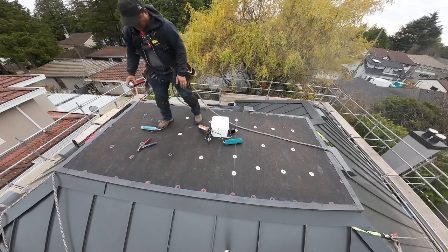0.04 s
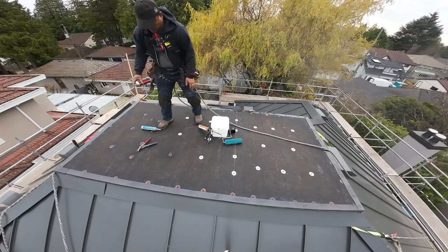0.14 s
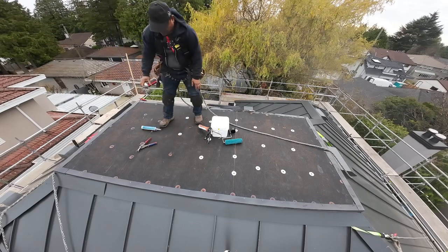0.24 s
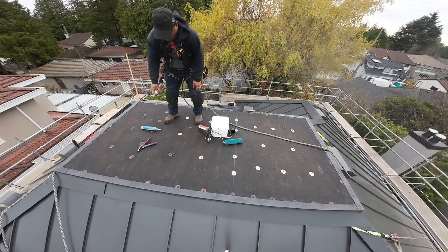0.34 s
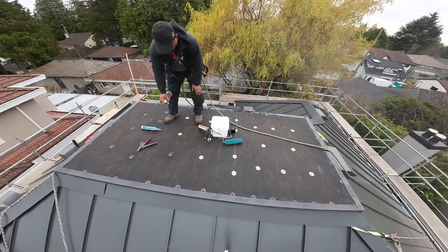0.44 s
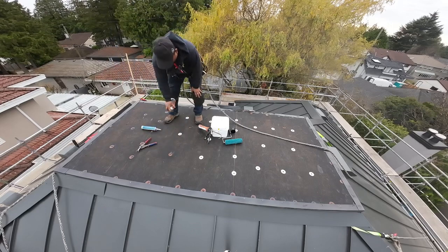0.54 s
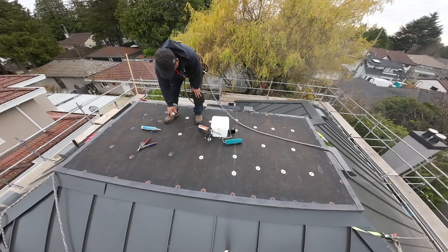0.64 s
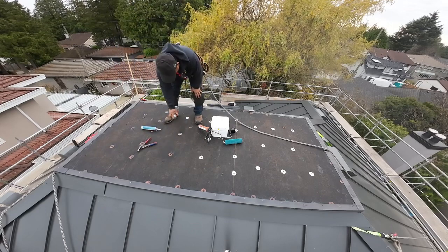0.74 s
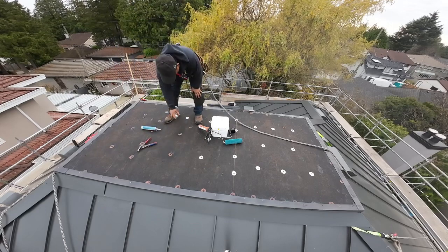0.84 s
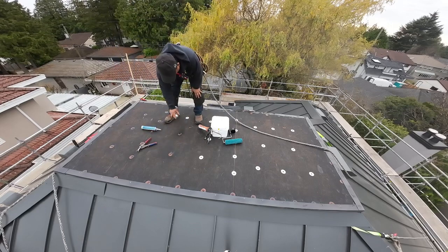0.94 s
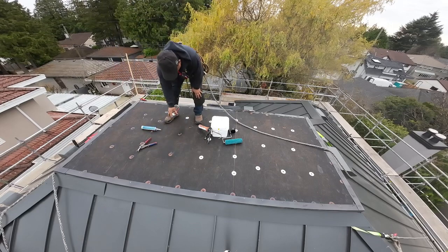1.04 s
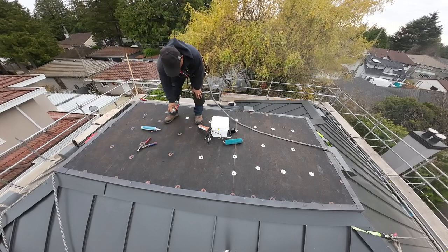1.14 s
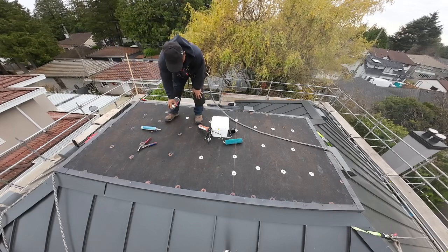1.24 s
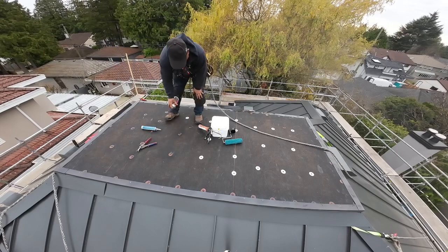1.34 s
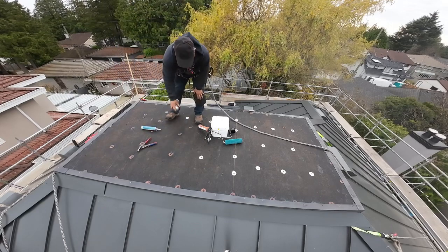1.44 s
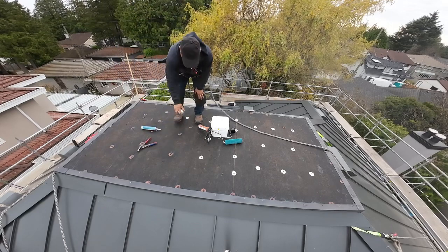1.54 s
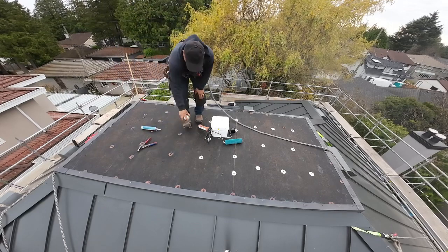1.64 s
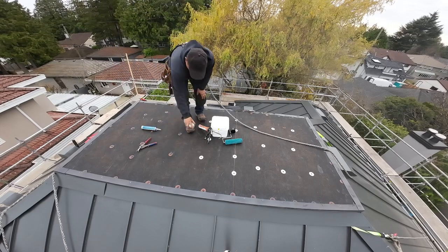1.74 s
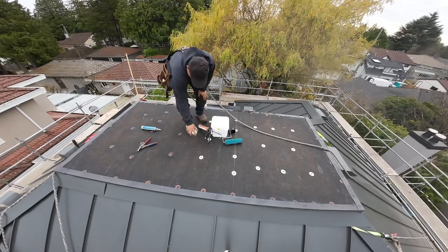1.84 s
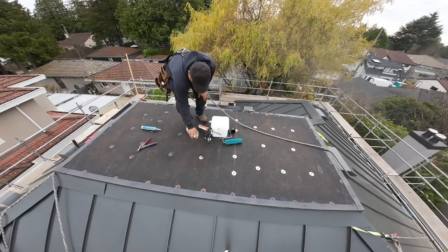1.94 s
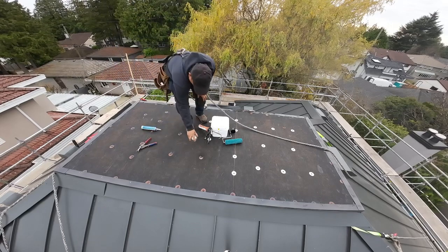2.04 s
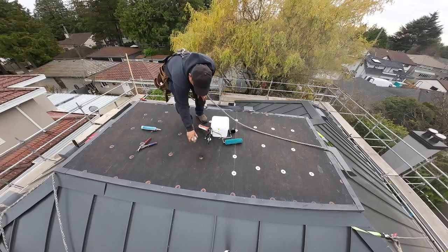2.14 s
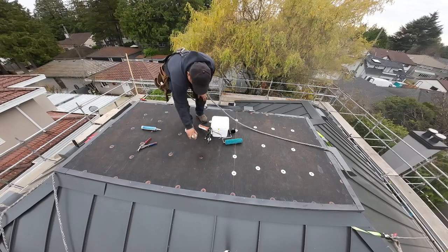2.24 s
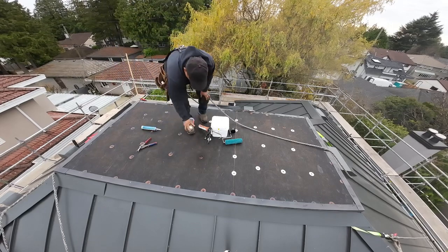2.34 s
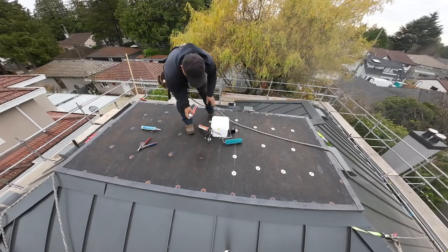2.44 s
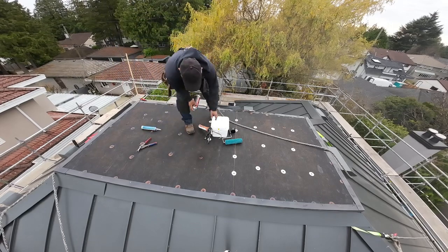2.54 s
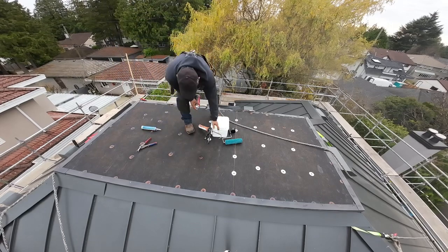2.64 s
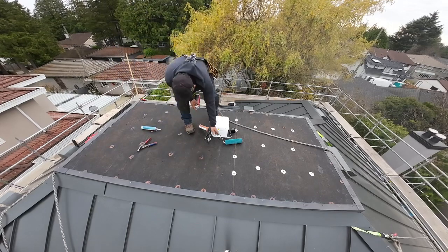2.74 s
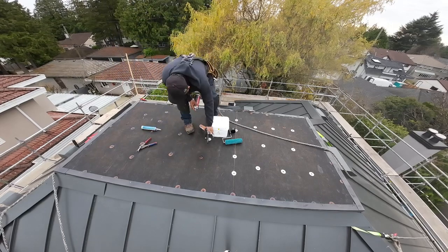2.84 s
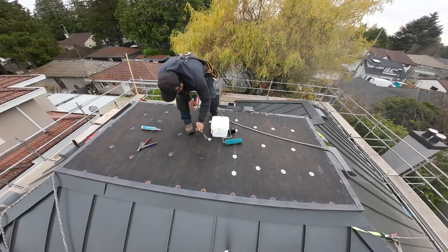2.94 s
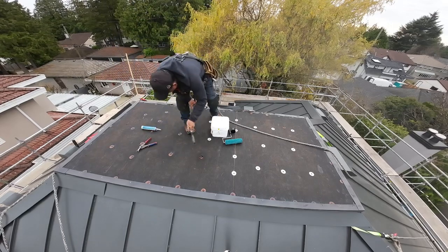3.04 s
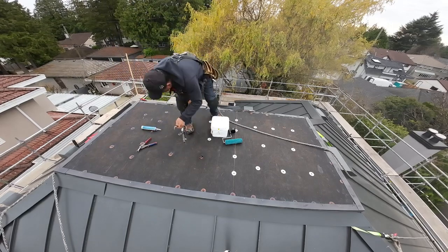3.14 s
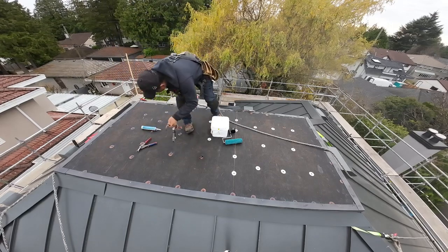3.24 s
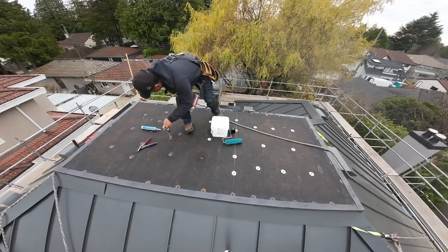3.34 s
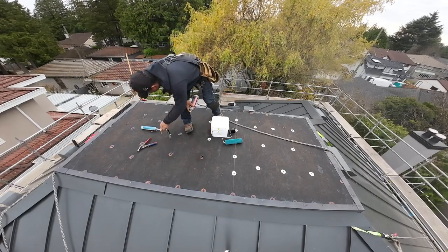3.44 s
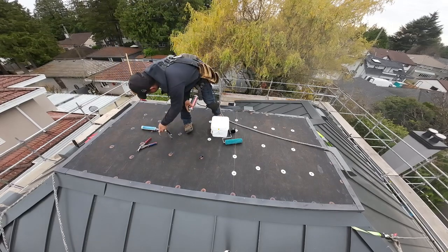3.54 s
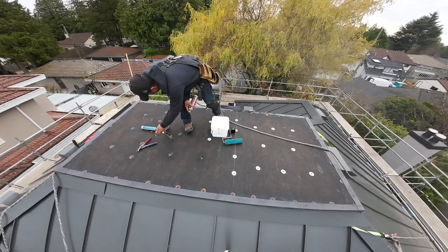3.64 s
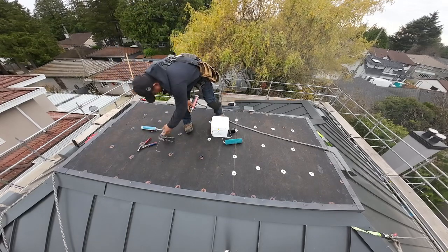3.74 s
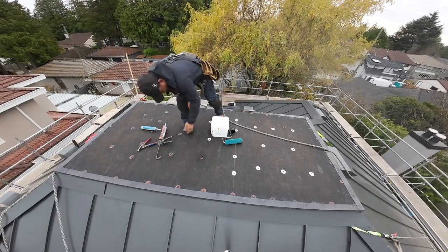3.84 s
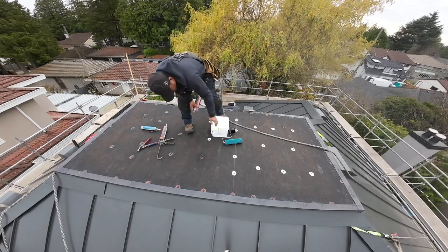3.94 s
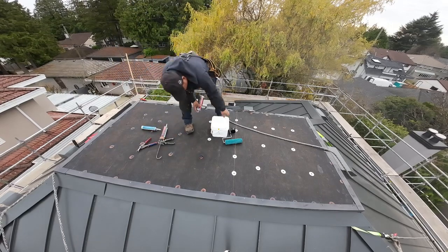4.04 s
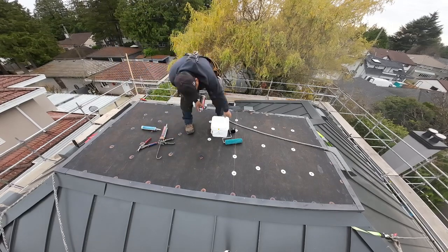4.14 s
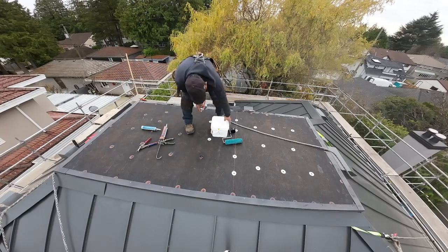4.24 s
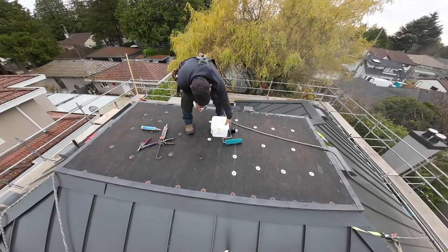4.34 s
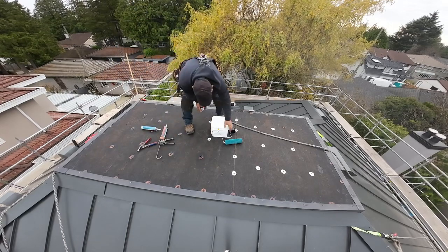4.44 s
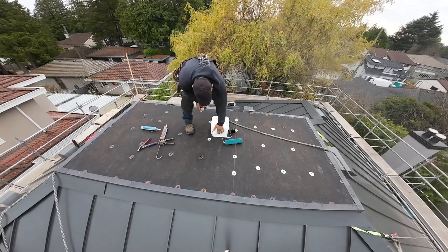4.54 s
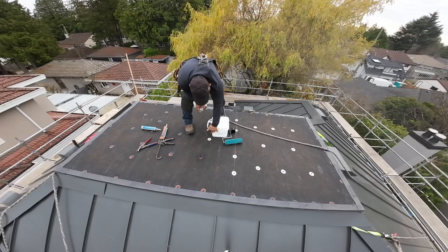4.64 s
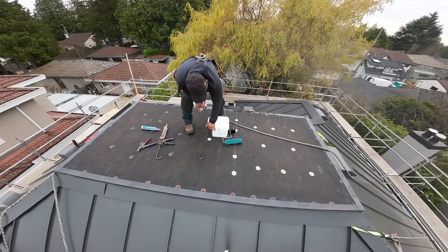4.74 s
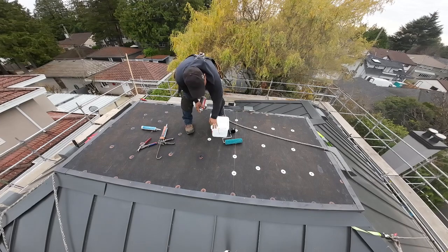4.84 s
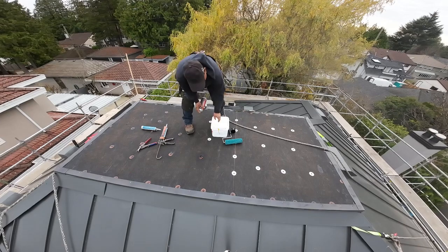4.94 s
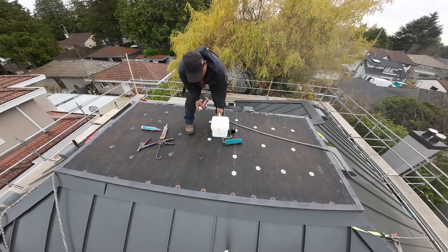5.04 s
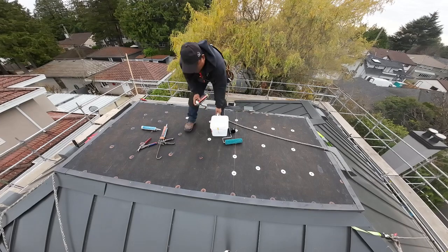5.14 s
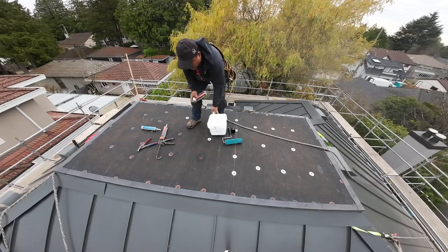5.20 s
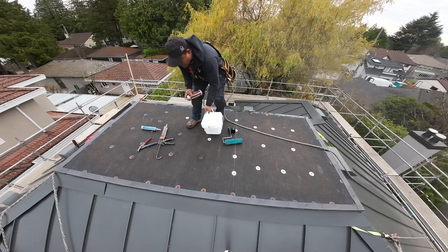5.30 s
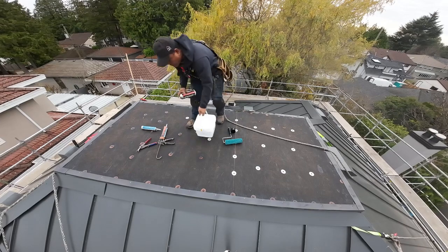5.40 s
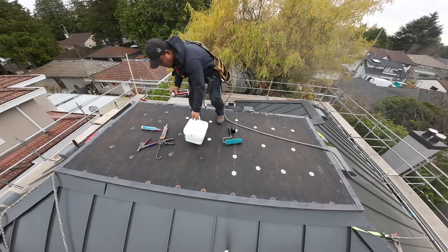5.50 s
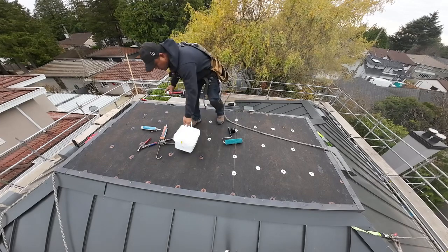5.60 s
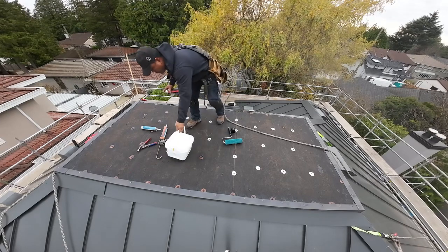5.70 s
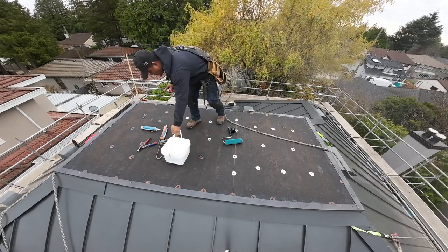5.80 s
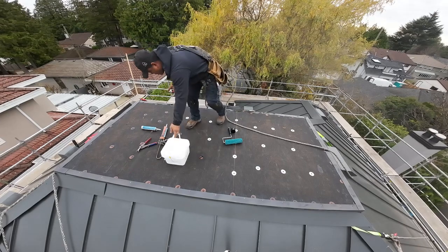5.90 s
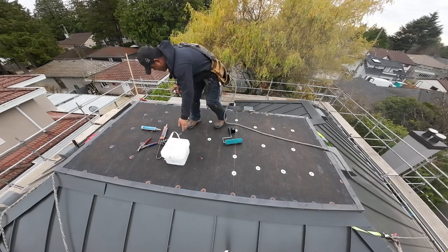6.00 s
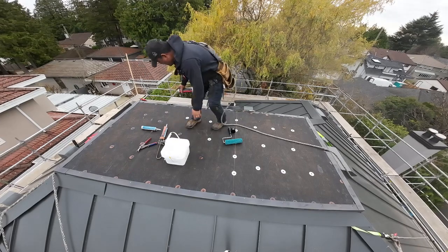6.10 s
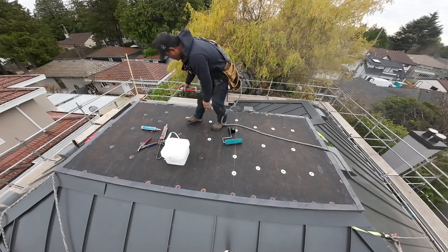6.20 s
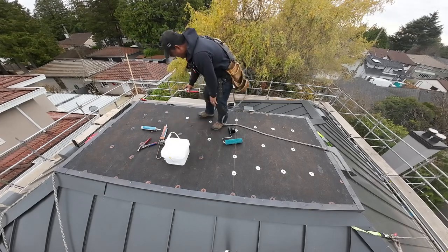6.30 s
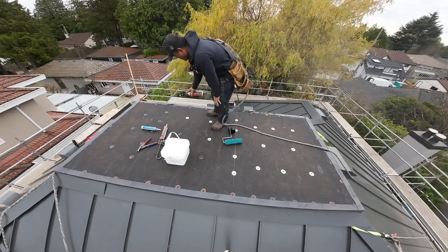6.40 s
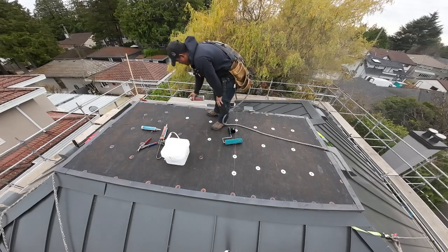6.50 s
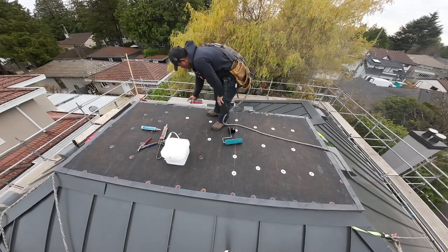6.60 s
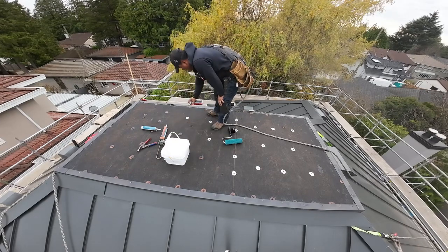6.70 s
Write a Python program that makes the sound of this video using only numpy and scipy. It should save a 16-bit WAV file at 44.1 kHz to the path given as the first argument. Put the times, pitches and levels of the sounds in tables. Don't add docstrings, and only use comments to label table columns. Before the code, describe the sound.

Outdoors on a flat roof, quiet scuffs and brief spray-can hisses over distant rumble, one loud clanking tool drop, later a hollow tub set-down.

```python
import sys
import numpy as np
from scipy import signal
from scipy.fft import rfft, irfft, next_fast_len
from scipy.io import wavfile
from scipy.ndimage import uniform_filter1d, map_coordinates

SR = 44100
rng = np.random.default_rng(int(sys.argv[2]) if len(sys.argv) > 2 else 0)


def how_loud(loudness_db):
    steps = np.asarray(loudness_db, float) / 20
    return 10 ** steps


def file_out(sig):
    cols = np.atleast_2d(sig).T
    lim = np.clip(cols, -1, 1)
    pcm = np.round(lim * 32767).astype(np.int16)
    wavfile.write(sys.argv[1], SR, pcm)


N = 298116


def unit(x):
    return x / np.sqrt(np.mean(x ** 2) + 1e-20)


def along(points, hz):
    f, v = np.transpose(points)
    return np.interp(np.log(hz + 1), np.log(f + 1), v)


def curve(rows):
    s, value = np.transpose(rows)
    return np.interp(np.arange(N) / SR, s, value)


def wobble(rate_hz):
    coarse = np.arange(0, N + 8, 8)
    knots = rng.standard_normal(int(N * rate_hz / SR) + 4)
    return np.interp(np.arange(N), coarse, map_coordinates(knots, [coarse * rate_hz / SR]))


def filtered(x, response):
    m = next_fast_len(N + 8192)
    return irfft(rfft(x, m) * response(np.fft.rfftfreq(m, 1 / SR)), m)[..., :N]


def smooth(z, bins, frames):
    return uniform_filter1d(uniform_filter1d(z, size=bins, axis=0), size=frames, axis=1)


# freq_hz, side_re_mid_db
WIDTH = [(60, -14.5), (200, -23), (600, -18), (2000, -23), (3700, -12), (6700, -10.5), (12000, -7)]


def rush(spectrum, patchy_db, grain_db, wide_db):
    grains = rng.standard_normal((2, N)) * how_loud(grain_db * wobble(700))
    z = signal.stft(grains, nperseg=512)[2]
    patches = unit(smooth(rng.standard_normal(z.shape[1:]), 4, 8))
    pair = signal.istft(z * how_loud(patchy_db * patches), nperseg=512)[1][:, :N]

    def colour(hz):
        side_db = along(WIDTH, hz) + wide_db
        return how_loud(along(spectrum, hz) + np.array([0 * hz, side_db]))

    mid, side = filtered(pair, colour)
    return np.array([mid + side, mid - side]) / np.std(mid)


def add(track, s, sound):
    part = track[round(s * SR):][:len(sound)]
    part += sound[:len(part)]


def ring(db, hz, t60_s, attack_s):
    t = np.arange(round(min(1.5 * t60_s, .5) * SR)) / SR
    return how_loud(db - 60 * t / t60_s) * (1 - np.exp(-t / attack_s)) * np.sin(2 * np.pi * hz * t)


def struck(rows, contact_ms):
    track = np.zeros(N)
    for s, db, hz, t60_s in rows:
        add(track, s, ring(db, hz, t60_s, contact_ms / 1000))
    return track


def damped(rows, t60_s, damping):
    return [(s, db, hz, t60_s * (300 / hz) ** damping) for s, db, hz in rows]


def after(events, t60_s, rise_s):
    s, db = np.transpose(events)[:, :, None]
    lag = np.maximum(np.arange(N) / SR - s, 0)
    return np.sum((how_loud(db - 60 * lag / t60_s) * (1 - np.exp(-lag / rise_s))) ** 2, axis=0)


# pitch_hz, wander_hz, level_db
FAN = [(72, 5, -50), (619, 1.2, -61)]


def fan():
    hum = np.zeros(N)
    for hz, wander_hz, db in FAN:
        phase = 2 * np.pi * np.cumsum(hz + wander_hz * wobble(12)) / SR
        hum += how_loud(db + 2.5 + 2.9 * wobble(7.6)) * np.sin(phase)
    return hum


# time_s, level_db
TRAFFIC = [(0, -44.5), (1.3, -47), (2.7, -46), (2.95, -44), (3.5, -45), (4.3, -44), (5.7, -44.5),
           (6.25, -47.5), (6.55, -44.5)]
# freq_hz, density_db
RUMBLE = [(12, -42.5), (20, -8), (65, -2), (160, -15.5), (210, -44), (350, -120)]
# freq_hz, density_db
ROAR = [(60, -18.5), (120, -1), (250, -5.5), (450, -9.5), (800, -14), (1200, -19.5), (2000, -34),
        (3500, -42), (4600, -44.5), (10000, -51.5), (12500, -58.5)]
# start_s, level_db
BOOMS = [
    (3.86, -30.5),
    (5.93, -36),
]


def traffic():
    low = np.sqrt(how_loud(curve(TRAFFIC)) ** 2 + after(BOOMS, t60_s=1.77, rise_s=0.04))
    echo = how_loud(-3.5) ** 2 * after(BOOMS, t60_s=.6, rise_s=.008)
    high = np.sqrt(how_loud(-49) ** 2 + echo)
    rumble = low * how_loud(1.84 * wobble(2.92)) * rush(RUMBLE, patchy_db=-0.5, grain_db=-0.5, wide_db=0.9)
    roar = high * how_loud(0.48 * wobble(5.7)) * rush(ROAR, patchy_db=1.42, grain_db=-0.5, wide_db=-0.45)
    return rumble + roar


# peak_s, level_db, half_length_s
STIRS = [(0.897, -72, .2), (1.817, -63.5, 0.11), (2.464, -71.5, 0.17), (2.9, -67, 0.14), (3.2, -66.5, .12),
         (3.553, -66.5, 0.25), (3.87, -58, 0.055), (4.723, -60.5, 0.072), (4.955, -64.5, 0.24),
         (6.15, -67.5, 0.24), (6.76, -64, 0.18)]


def clothes():
    t = np.arange(N) / SR
    stir = sum(how_loud(db - 5.5 * ((t - s) / half_s) ** 2) ** 2 for s, db, half_s in STIRS)
    return (stir + how_loud(-75.5) ** 2) * how_loud(7.1 * wobble(22))


def scuffs(rows, body_db, rise_share):
    return [(s, db, body_db, fizz_db, rise_share * width_ms, (2 - rise_share) * width_ms)
            for s, db, fizz_db, width_ms in rows]


# peak_s, scrape_db, fizz_re_scrape_db, width_ms
BOOTS = [(.377, -51.5, -2, 14.8), (.81, -51, -14, 21), (2.204, -49.5, -16, 22.8), (2.724, -53.5, -14, 25),
         (2.768, -49, -32, 23), (2.842, -50.5, -10, 20), (2.96, -55, -15, 20), (3.195, -53.5, -14, 19),
         (4.454, -53, -12, 16.3), (4.78, -48, -20, 22), (5.143, -53, -11.5, 16), (5.259, -47.5, -6.5, 13),
         (5.912, -48, -30, 9.5), (5.927, -40, -30, 13.6), (5.966, -50, -6.5, 9.2), (6.226, -54, -9.5, 15)]


def boots():
    return scuffs(BOOTS, body_db=2, rise_share=1.02)


# peak_s, scrape_db, fizz_re_scrape_db, width_ms
GLOVES = [(.226, -60.5, -0.5, 14), (.276, -47.5, -17, 10.5), (.531, -54, -12, 30), (1.26, -63.5, -15, 16),
          (1.728, -60.5, -2, 11), (1.798, -55, -6, 23), (3.154, -50.5, -7.5, 13), (3.262, -59.5, -4, 20),
          (3.35, -59, -8, 8.5), (3.673, -43.5, -5.5, 15.7), (4.525, -50, -23, 25), (4.852, -57, -20, 23),
          (4.89, -59, -6.5, 8.1), (5.018, -52, -16, 11), (5.432, -55, 4, 5.3), (5.51, -68, -3, 9.5),
          (6.018, -41.5, -12.5, 16.6), (6.125, -64, -4.5, 37), (6.283, -60.5, -3, 15),
          (6.515, -69.5, 7.5, 18)]


def gloves():
    return scuffs(GLOVES, body_db=-6, rise_share=0.93)


# peak_s, scrape_db, fizz_re_scrape_db, width_ms
TAPS = [
    (3.42, -49.5, -3, 24),
    (5.235, -51.5, -5, 10.6),
    (5.828, -54.5, -9, 10),
    (6.45, -49.5, -3.5, 10),
]


def taps():
    return scuffs(TAPS, body_db=3.5, rise_share=0.54)


# peak_s, scrape_db, fizz_re_scrape_db, rise_ms, fall_ms
FASTENERS = [(.685, -54.5, -5, 13, 16), (1.642, -52.5, -12.5, 14, 38), (1.886, -61, -10, 20, 40),
             (2.028, -53, -23, 8.2, 26), (2.292, -56, -15, 13, 23), (3.048, -44.5, 1.5, 12, 19),
             (3.22, -58.5, 1.5, 10, 14), (3.116, -53.5, -2.5, 11, 6.7), (4.331, -60, -3.5, 7.9, 31),
             (4.648, -35.5, -22, 9.5, 4.2), (4.67, -53, -11, 8, 20), (4.73, -34, -10.5, 14, 20)]


def fasteners():
    return [(s, db, -13.5, fizz_db, rise_ms, fall_ms) for s, db, fizz_db, rise_ms, fall_ms in FASTENERS]


# peak_s, scrape_db, body_re_scrape_db, rise_ms, fall_ms
BOUNCES = [
    (3.797, -40.5, -6, 11.7, 9.6),
    (3.84, -38, 2, 9, 6),
    (3.85, -21, 1.5, 5.8, 7),
    (3.924, -34.5, -11, 8, 8),
    (3.945, -45.5, -8, 10, 16),
    (3.985, -44, -3.5, 12, 19),
    (4.007, -33, -4.5, 7.3, 8.8),
]


def bounces():
    return [(s, db, body_db, -4, rise_ms, fall_ms) for s, db, body_db, rise_ms, fall_ms in BOUNCES]


# freq_hz, density_db
BODY = [(200, -6), (450, 1), (900, 0.5), (1400, -4.5), (2500, -60)]
# freq_hz, density_db
SCRAPE = [(700, -19.5), (1400, -0.5), (2600, -1), (4000, -3), (4800, -11), (7000, -28.5)]
# freq_hz, density_db
FIZZ = [(3500, -27.5), (5000, 5), (6500, 2), (9000, 0.5), (11500, -4.5), (12500, -35)]


def contacts():
    t_ms = np.arange(N) / SR * 1000
    power = np.zeros((3, N))
    for s, db, body_db, fizz_db, rise_ms, fall_ms in boots() + gloves() + taps() + fasteners() + bounces():
        middle = round(s * SR)
        near = slice(max(middle - SR // 5, 0), middle + SR // 5)
        lag_ms = t_ms[near] - s * 1000
        early = lag_ms < 0
        fade_db = -8 * np.abs(lag_ms / np.where(early, rise_ms, fall_ms)) ** np.where(early, 1.5, 1.2)
        answer_db = np.where(lag_ms > 0, -21 - 0.45 * lag_ms, -np.inf)
        fade_db = np.maximum(fade_db, answer_db)
        power[:, near] += how_loud(db + fade_db + np.array([[body_db], [0], [fizz_db]])) ** 2
    rustle = clothes()
    power[1] += rustle
    power[2] += rustle * how_loud(-13)
    body, scrape, fizz = np.sqrt(power)
    return (body * rush(BODY, patchy_db=2.5, grain_db=1.0, wide_db=-0.5)
            + scrape * rush(SCRAPE, patchy_db=2.0, grain_db=2.0, wide_db=-1.0)
            + fizz * rush(FIZZ, patchy_db=3.5, grain_db=1.7, wide_db=-3.2))


# freq_hz, left_re_right_db
LEAN = [(300, -0.5), (1200, 1.23), (3700, 1.3), (7000, 0), (12000, -2.5)]
# freq_hz, phase_rad
LEAD = [(4500, 0.011), (6000, 0.56), (8000, 0.17), (10000, 0.74), (11500, 1)]


def ports(hz, share):
    half = np.array([[.5], [-.5]]) * share
    return how_loud(along(LEAN, hz) * half) * np.exp(1j * along(LEAD, hz) * half)


# freq_hz, gain_db
TOOL = [(500, 0.5), (750, -3), (1150, 0), (1700, 3), (3000, -0.7), (5000, -4), (10300, 4.5), (11800, -6)]
# start_s, end_s
DROP = (3.77, 4.05)


def dropped(x):
    t = np.arange(N) / SR
    inside = (t > DROP[0]) & (t < DROP[1])
    return x * ~inside + filtered(x * inside, lambda hz: how_loud(along(TOOL, hz)) * ports(hz, 0.75))


# start_s, level_db, tilt_db_per_octave, pitch_ratio
CLINKS = [
    (2.755, -38.5, -2, 0.99),
    (2.768, -45, 2.5, 1.0),
    (2.79, -48, 0, 0.99),
    (2.827, -53.5, 11.5, .94),
    (4.503, -45.5, -2, 0.99),
    (4.517, -39, -3, 1.0),
    (4.57, -48, -5, 0.96),
    (4.6, -50, -6, 0.97),
]
# pitch_hz, level_db, t60_s
PLATE = [(1950, -23, 0.092), (2630, 1, 0.14), (3840, -4.5, 0.15), (4520, -18, .09), (6000, -8.5, 0.15)]


def plates():
    out = np.zeros(N)
    for hz, level_db, t60_s in PLATE:
        note = np.zeros(N)
        for s, db, tilt_db, pitch in CLINKS:
            mode_db = db + level_db + tilt_db * np.log2(hz / 2600)
            add(note, s, ring(mode_db, hz * pitch, t60_s, attack_s=0.0059))
        chatter = .3 * hz / 2600
        out += note * (1 - chatter + 1.2 * chatter * wobble(280))
    return out * how_loud(np.array([[.8], [-.8]]))


# start_s, held_s, hiss_db, swell_db
BURSTS = [
    (0.634, .437, -59.5, 4),
    (1.862, 0.441, -53.5, 0),
    (6.67, .3, -57.5, -11),
]
# freq_hz, density_db
JET = [(880, -38), (1500, -8), (3100, -7), (3390, -1.5), (5830, -6), (11100, 4), (11900, 2), (12500, -34),
       (16200, -62), (22000, -120)]
# time_s, echo_lag_ms
HAND = [(.63, .8), (.66, 1), (.74, 0.75), (.86, 0.67), (1.07, 0.77), (1.88, 1.5), (1.96, .91), (2.06, 0.8),
        (2.2, 0.846), (2.3, .79), (6.66, 0.37), (6.76, 0.37)]


def spray():
    t = np.arange(N) / SR
    hiss = np.zeros(N)
    for s, held_s, db, swell_db in BURSTS:
        opening = np.clip((t - s) / 0.024, 0, 1)
        swell = swell_db * np.clip((t - s) / held_s, 0, 1)
        shut_db = 1300 * np.maximum(t - s - held_s, 0)
        hiss += opening * how_loud(db + swell - shut_db)
    jet = rush(JET, patchy_db=2.0, grain_db=0.0, wide_db=-5)
    later = np.arange(N) - curve(HAND) * SR / 1000
    echo = np.array([map_coordinates(side, [later]) for side in jet])
    return hiss * unit(jet + 0.5 * echo)


# start_s, level_db, pitch_hz
STEPS = [
    (4.468, -25.5, 74),
    (5.245, -27.5, 40),
    (5.918, -16, 43.8),
    (6.05, -25.5, 40),
    (6.22, -27, 51.7),
]


def steps():
    return struck(damped(STEPS, t60_s=0.15, damping=0), contact_ms=8)


# start_s, level_db, pitch_hz
KNOCKS = [
    (2.228, -26.5, 155),
    (2.6, -33, 298),
    (2.703, -31, 470),
    (2.712, -33, 288),
    (2.722, -30, 837),
    (2.73, -34, 493),
    (2.771, -37, 212),
    (3.669, -25, 185),
    (4.718, -30.5, 330),
]


def knocks():
    return struck(damped(KNOCKS, t60_s=0.059, damping=0.35), contact_ms=3.2)


# start_s, level_db, pitch_hz
HANDLE = [
    (4.718, -34, 3850),
    (4.733, -34, 4050),
    (4.742, -38.5, 3790),
    (5.998, -44, 3250),
    (6.011, -42, 3440),
    (6.027, -44, 3150),
]


def handle():
    return struck(damped(HANDLE, t60_s=0.057, damping=0), contact_ms=2.5)


# start_s, level_db, pitch_hz
TUB = [
    (5.905, -28.5, 585),
    (5.915, -23, 406),
    (5.928, -19.5, 204),
    (5.929, -24.5, 101),
    (5.937, -23, 300),
    (5.951, -16, 193),
    (5.958, -23, 336),
    (5.975, -28.5, 260),
]


def tub():
    return struck(damped(TUB, t60_s=.065, damping=0.66), contact_ms=2.5)


# start_s, level_db, pitch_hz, t60_s
SWAY = [
    (3.875, -28.5, 63.2, 0.94),
    (3.871, -32.5, 191, 0.32),
    (3.929, -29, 65.2, 0.37),
    (5.93, -36, 55.9, 1),
    (5.93, -46, 169, 0.55),
    (6.0, -47, 42, .5),
]


def mount():
    sway, shake = np.zeros((2, N))
    t = np.arange(SR) / SR
    for s, db, hz, t60_s in SWAY:
        add(sway, s, ring(db, hz, t60_s, attack_s=.006))
        add(shake, s, how_loud(db - 13 - 60 * t / (1.3 * t60_s)))
    rattle = unit(filtered(rng.standard_normal(N), lambda hz: how_loud(along(RUMBLE, hz / 1.07))))
    push = sway * how_loud(2.2 * wobble(25)) + shake * rattle
    return np.array([push, -push])


# start_s, level_db, pitch_hz, t60_s
LANDINGS = [
    (3.845, -6, 278, 0.03),
    (3.8483, -8, 169.5, 0.092),
    (3.874, -17.5, 163, .11),
    (3.922, -20, 157, .1),
    (3.938, -22, 187, .14),
    (4.005, -25.5, 343, 0.061),
]
# start_s, level_db, pitch_hz, t60_s
CLANKS = [
    (3.844, -8, 1103, 0.022),
    (3.864, -28, 1204, 0.049),
    (3.874, -34, 1480, 0.039),
    (3.939, -34, 1390, 0.039),
    (4.004, -24.5, 1495, 0.041),
]


def tool():
    return struck(LANDINGS, contact_ms=1.47) + struck(CLANKS, contact_ms=1.8)


def scene():
    background = fan() + traffic()
    deck = steps() + knocks() + handle() + tub() + mount() + tool()
    return background + dropped(contacts()) + plates() + spray() + deck


# freq_hz, gain_db
SHELL = [(3800, 0.11), (4500, -2.5), (5200, 0.5), (8000, -0.7), (8800, -5), (9600, 0.7)]


def shell(x):
    return filtered(x, lambda hz: how_loud(along(SHELL, hz)) * ports(hz, 0.93))


def thinned(x):
    pair = np.array([x[0] + x[1], x[0] - x[1]]) / 2
    hz, t, (mid, side) = signal.stft(pair, SR, nperseg=1024)
    luck = rng.standard_normal((len(hz) // 4 + 1, len(t)))
    luck = unit(uniform_filter1d(luck, size=7, axis=1))[np.arange(len(hz)) // 4]
    hole = (luck > 1.95) & (hz[:, None] > 3200)
    band = (4 * np.log2(1 + hz / 150)).astype(int)
    spare = rng.standard_normal((band[-1] + 1, len(t)))
    spare_db = 4 * unit(uniform_filter1d(spare, size=4, axis=1))[band]
    side_power, mid_power = smooth(np.abs(side) ** 2, 4, 6), smooth(np.abs(mid) ** 2, 4, 6)
    weak = side_power * how_loud(spare_db + 16) ** 2 < mid_power
    sag_hz = 1610 * np.exp(-((t - 4.5) / 0.096) ** 4)
    frame = np.minimum(t * SR, N - 1).astype(int)
    edge_hz = 11640 - sag_hz + 150 * wobble(14)[frame]
    top = how_loud(-np.clip((hz[:, None] - edge_hz) * .15, 0, 45))
    mid = mid * top * np.where(hole, how_loud(-20), 1)
    side = side * top * np.where(weak, how_loud(-18), 1)
    return signal.istft(np.array([mid + side, mid - side]), SR, nperseg=1024)[1][:, :N]


def band_limit(x):
    return signal.sosfilt(signal.butter(12, 12710, fs=SR, output="sos"), x)


def record(dry):
    mix = thinned(shell(dry))
    return band_limit(mix)


dry = scene()
out = record(dry)
file_out(out)
```